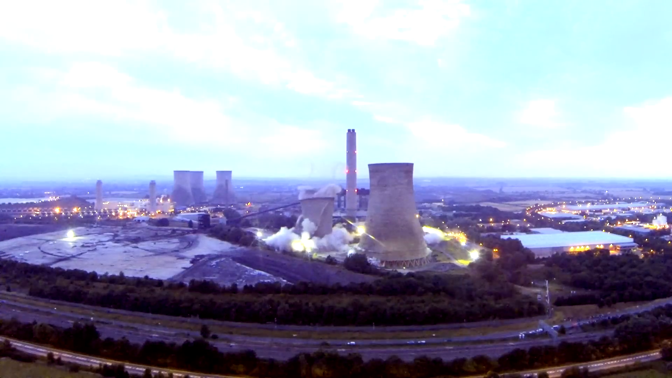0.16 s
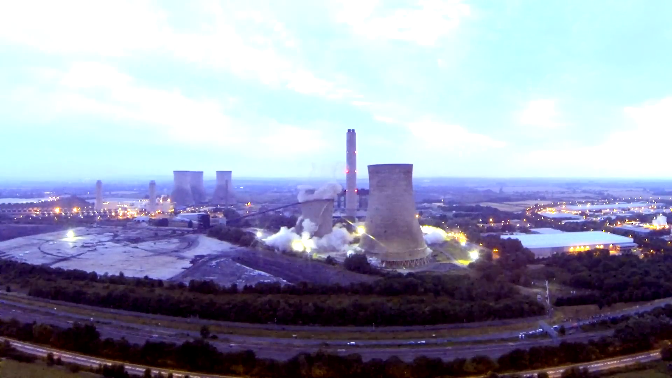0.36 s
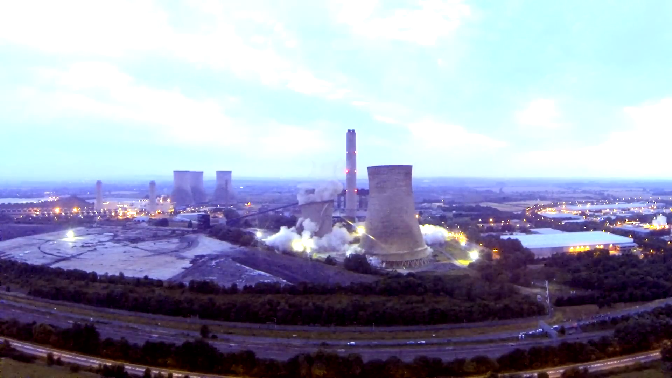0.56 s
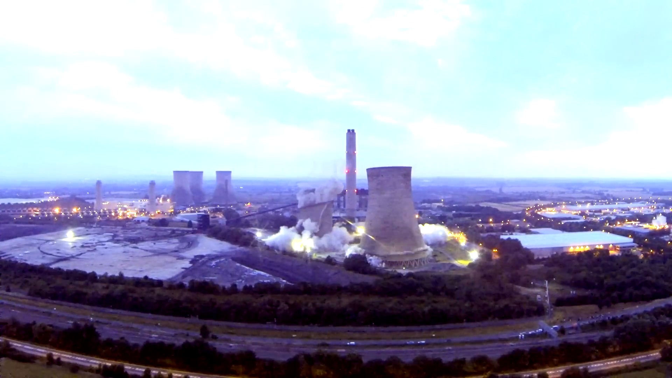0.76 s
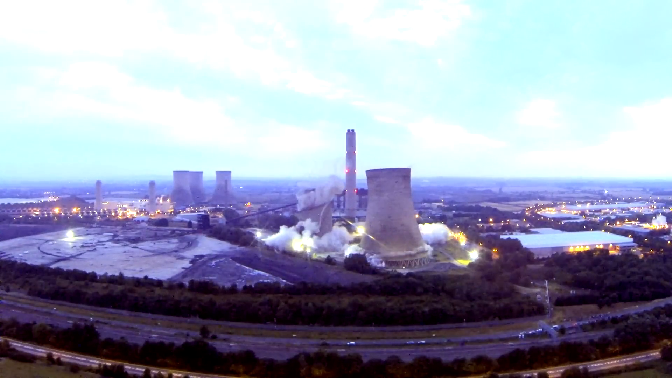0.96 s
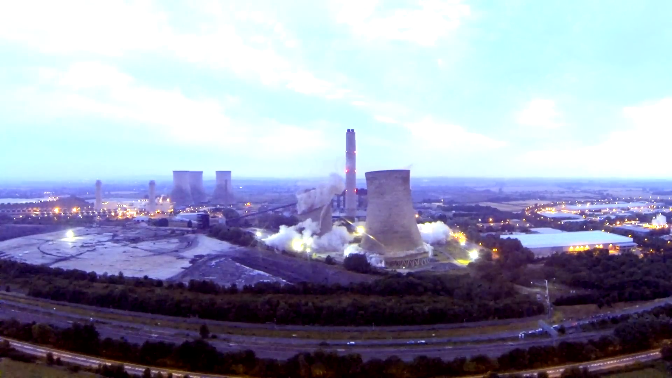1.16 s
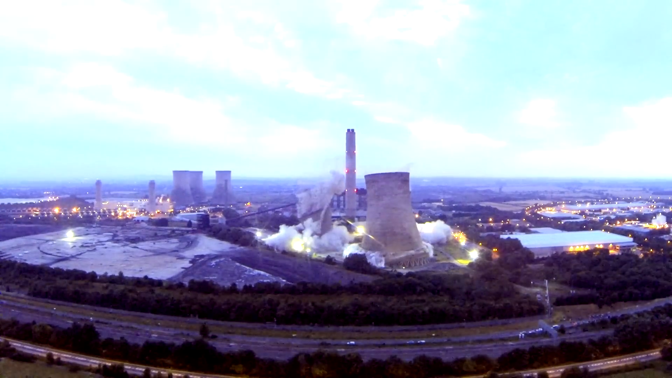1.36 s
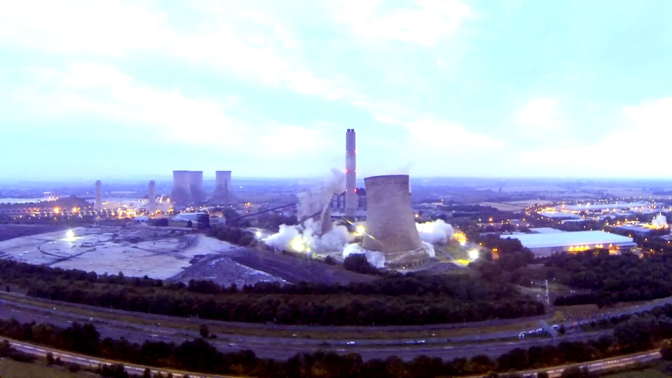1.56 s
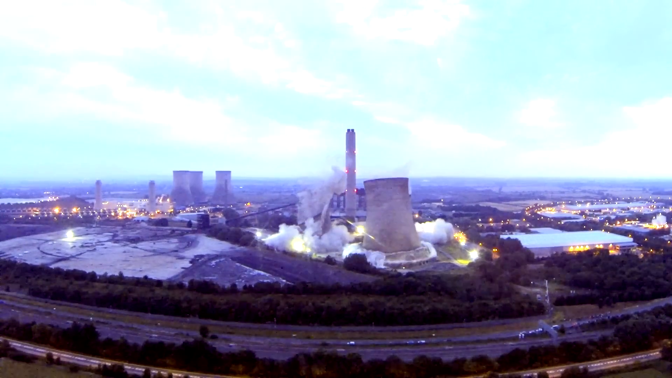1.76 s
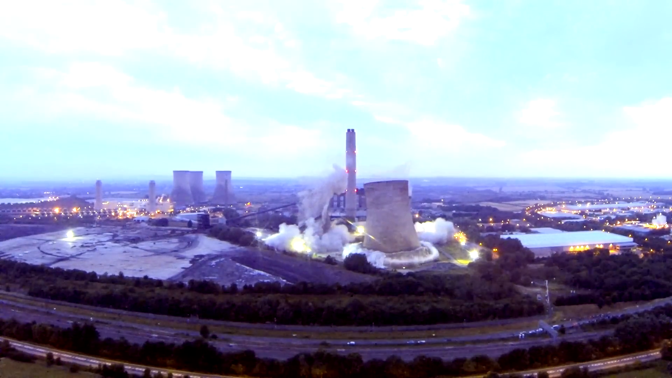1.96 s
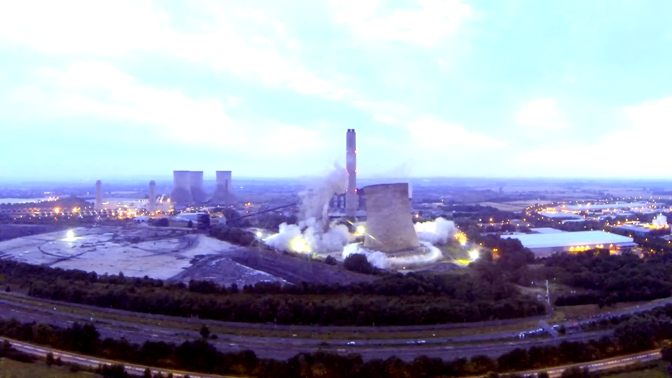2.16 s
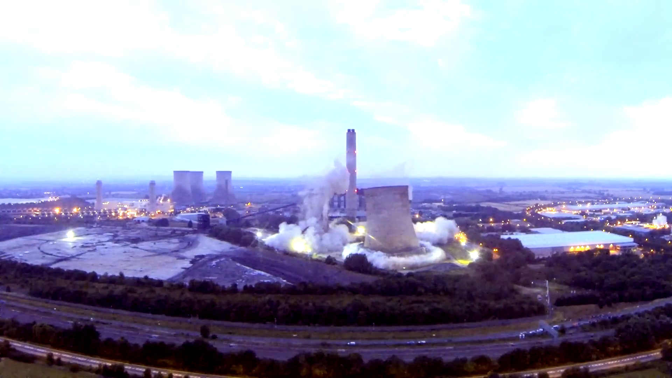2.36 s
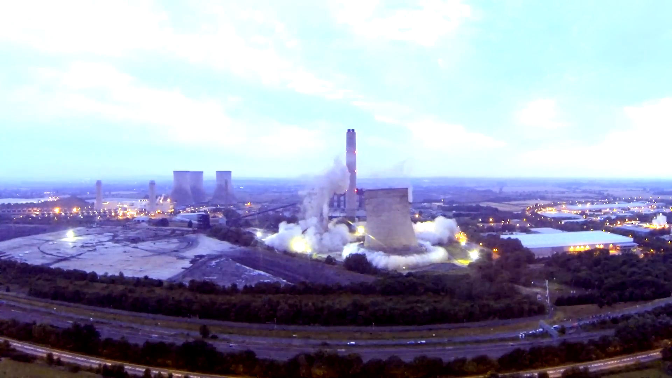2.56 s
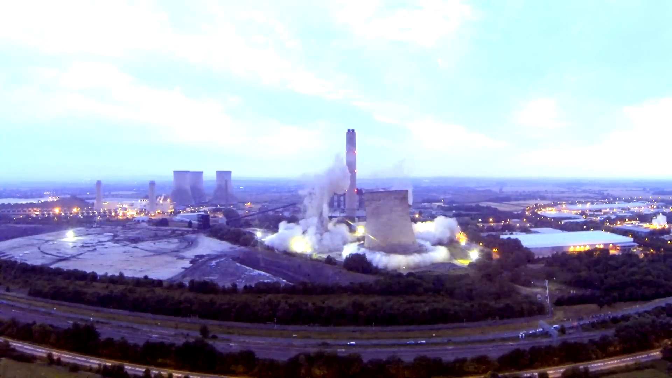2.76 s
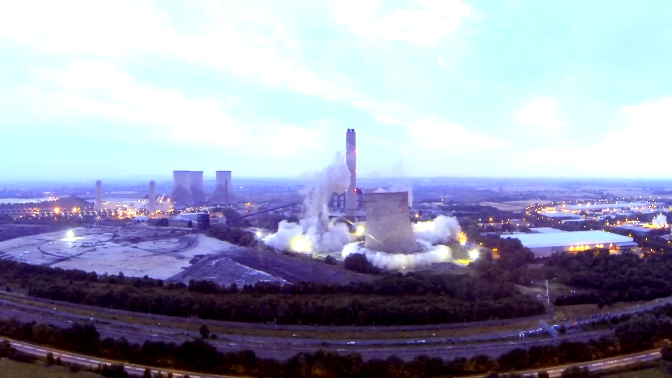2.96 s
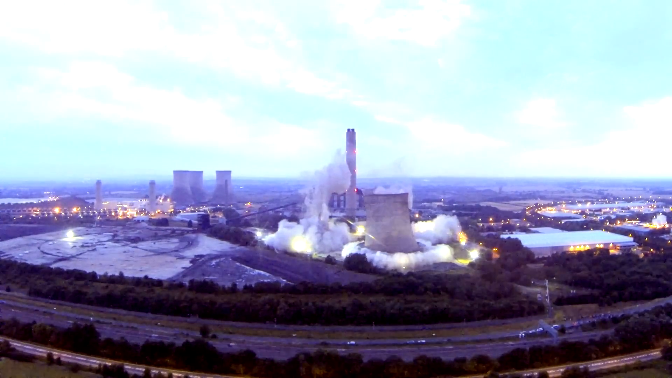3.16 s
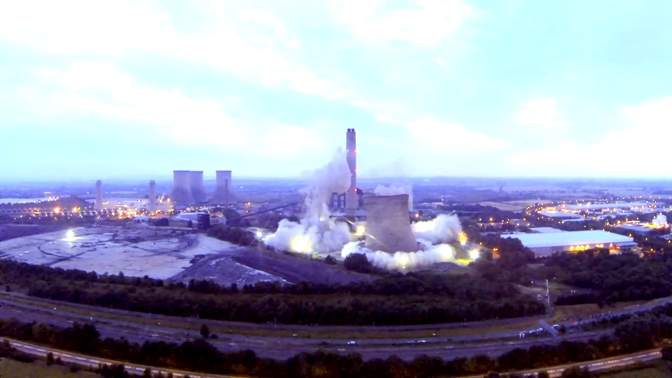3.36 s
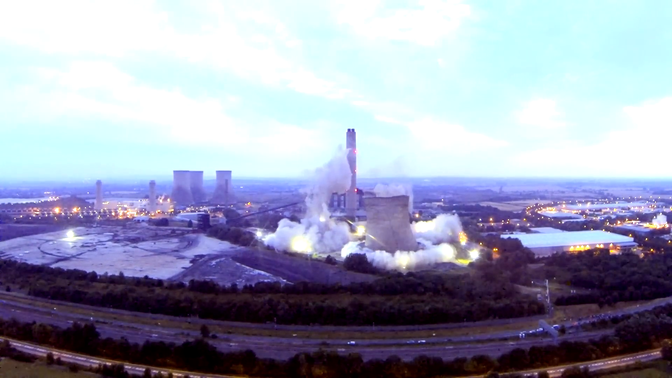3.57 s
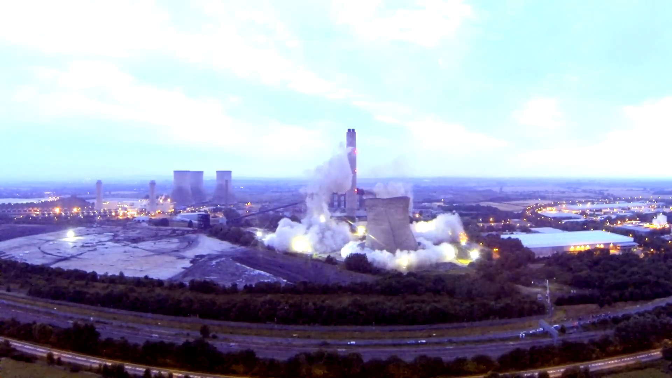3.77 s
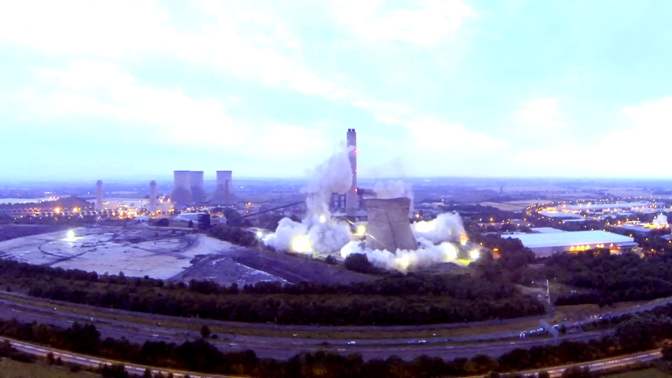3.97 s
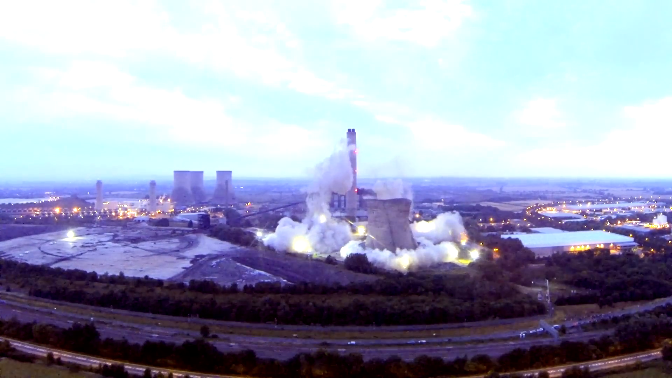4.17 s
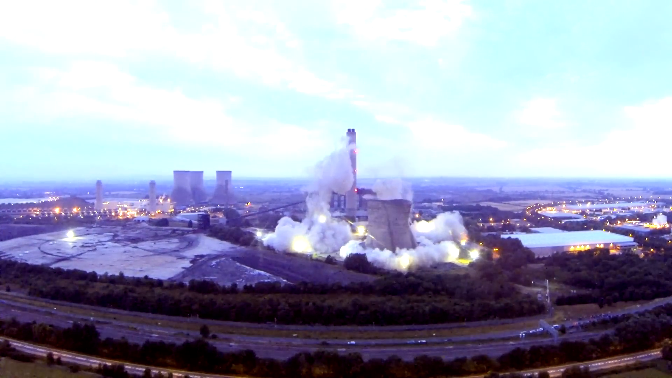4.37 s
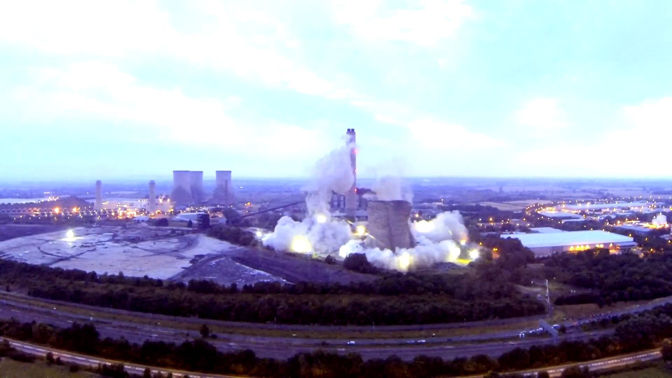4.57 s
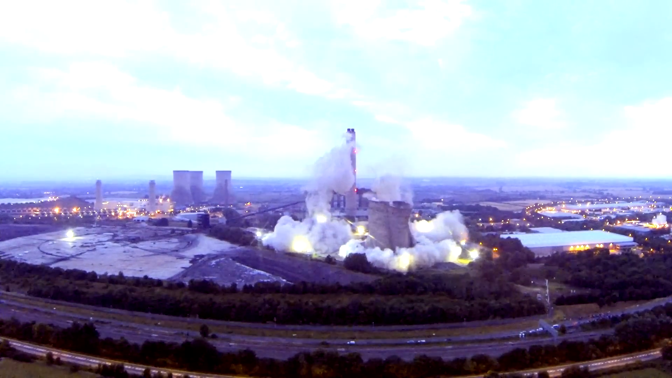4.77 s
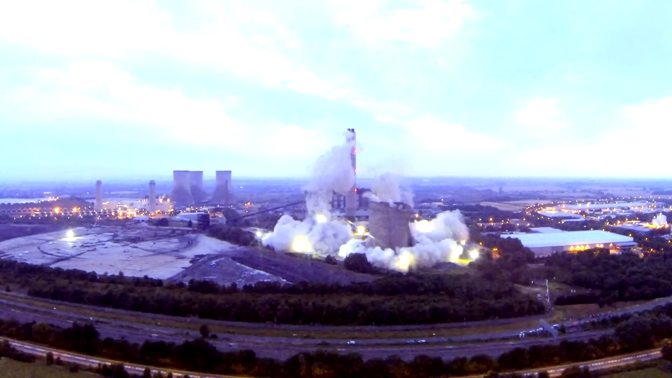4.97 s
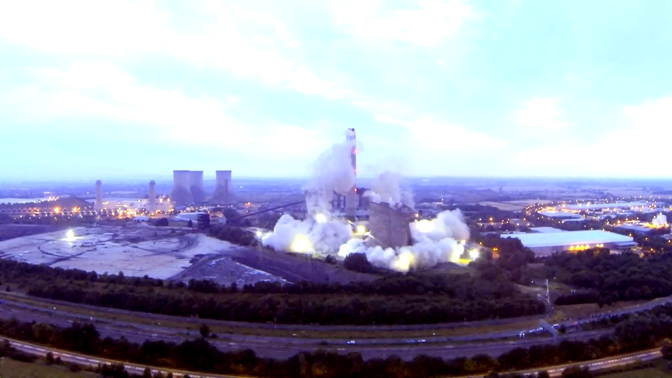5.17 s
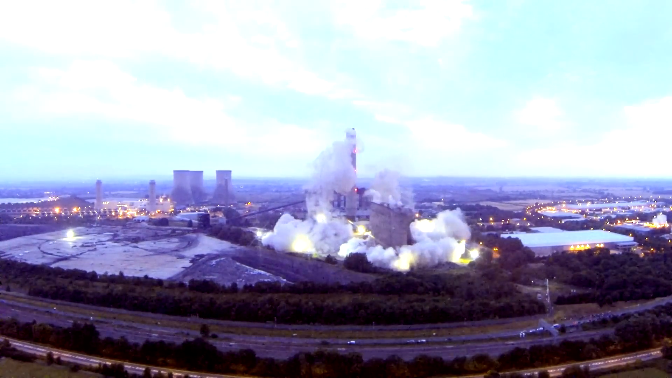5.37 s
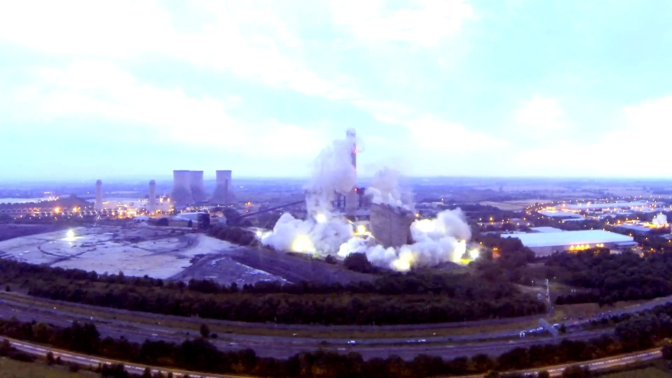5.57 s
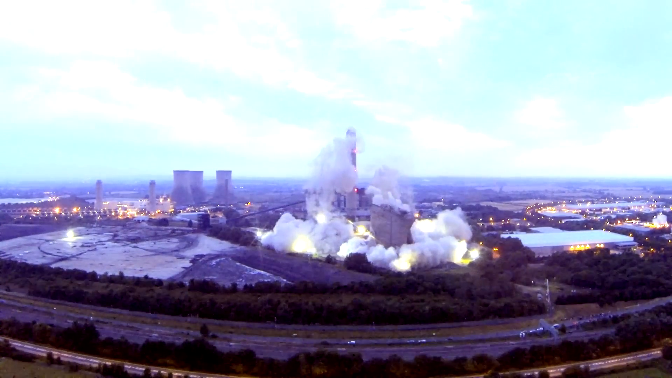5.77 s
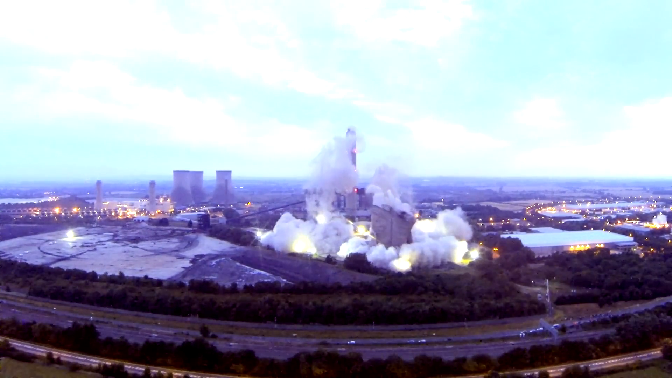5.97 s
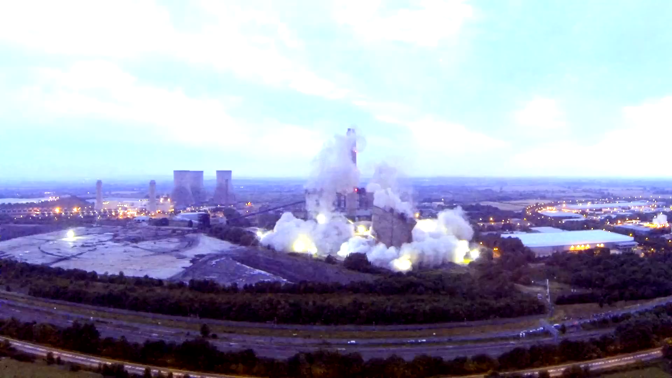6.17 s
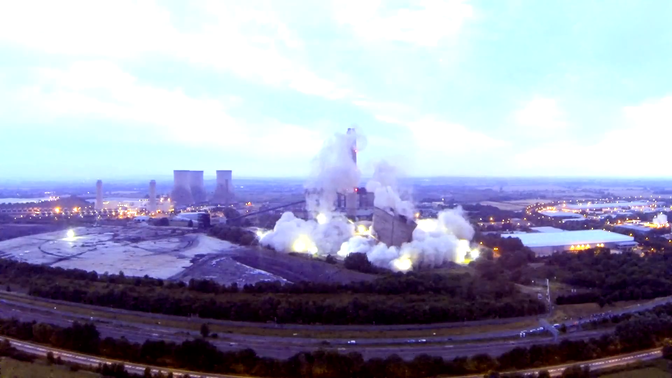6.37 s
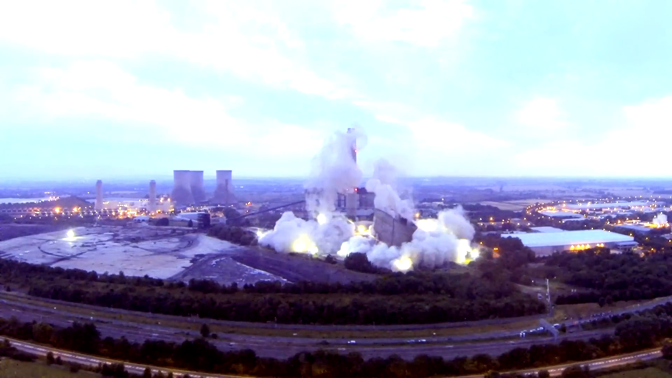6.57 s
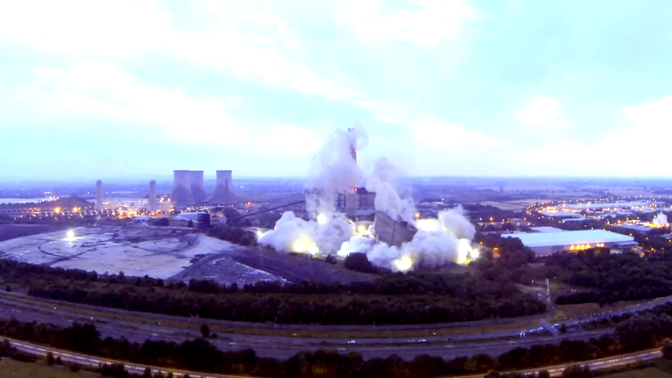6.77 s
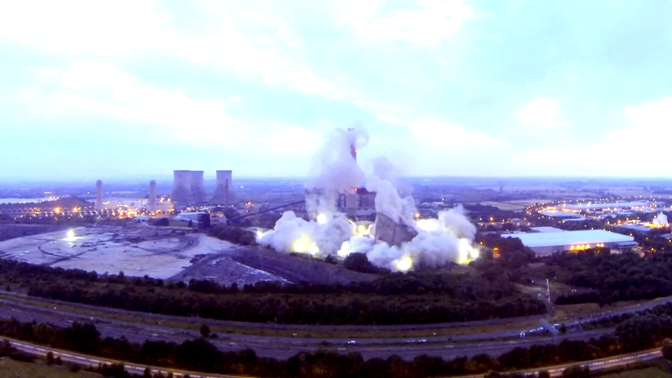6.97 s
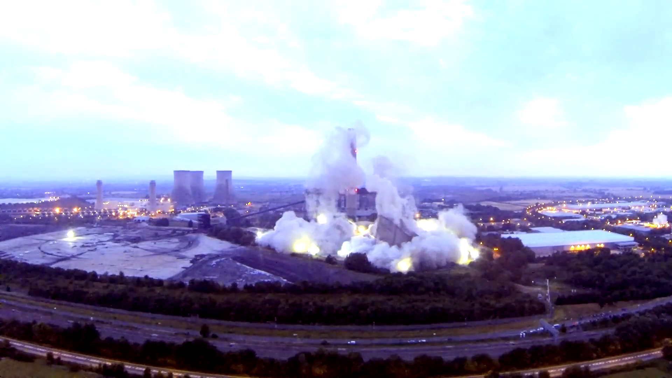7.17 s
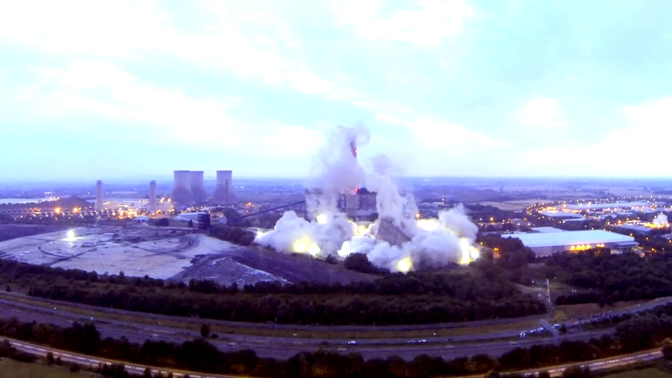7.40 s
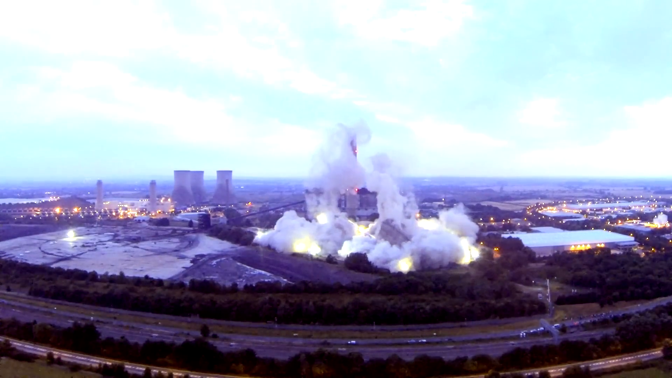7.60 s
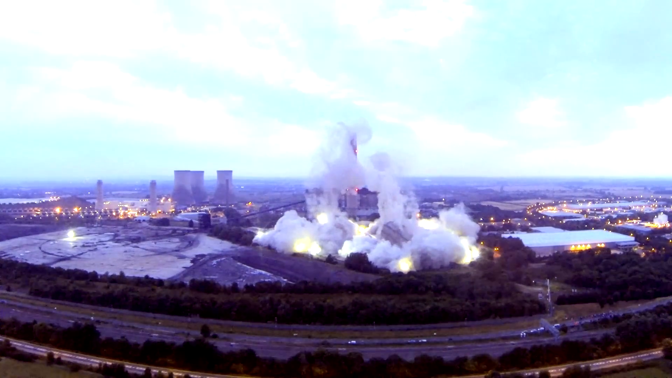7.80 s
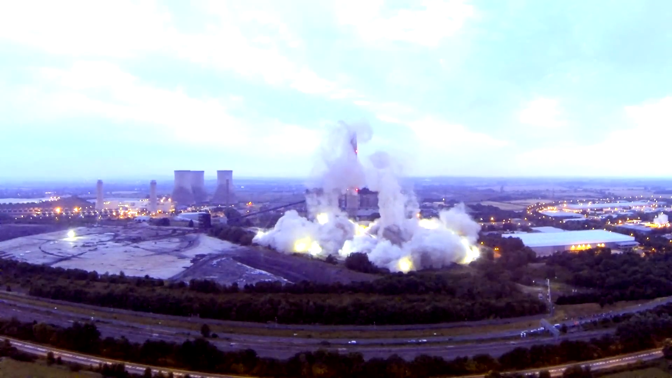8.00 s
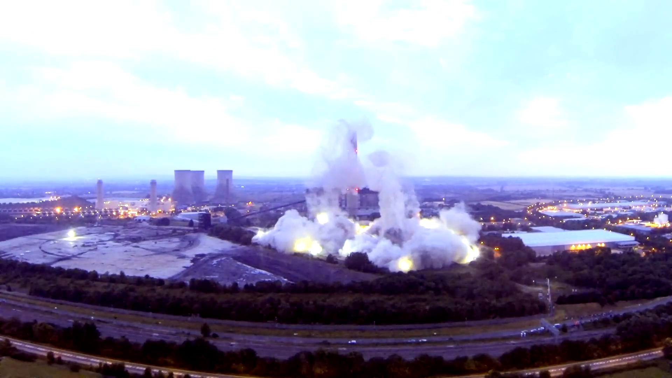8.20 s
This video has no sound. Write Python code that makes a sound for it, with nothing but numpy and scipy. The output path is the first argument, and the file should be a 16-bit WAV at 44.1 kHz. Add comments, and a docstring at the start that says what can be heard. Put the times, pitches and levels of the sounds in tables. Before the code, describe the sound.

Heavy distant demolition blasts hit at once, then cooling towers collapse in a deep roll and hollow concrete roar, sinking over thin hiss and whine.

```python
"""A heavy roar and deep roll begin at once with blast waves, as cooling towers are blown up far away.
Blasts are pressure pulses; the roll, thuds and breaking concrete are random blows through filters.
Hail, fizz and sharp cracks ring a hollow camera housing; the long rumble sinks in surges and echoes.
Hiss, buzz and whine run beneath; ticks are scattered throughout, with a few faint chirps.
Low throbs come late, and a small hard snap near 8 s."""
import sys
import numpy as np
from scipy import signal
from scipy.fft import rfft, irfft
from scipy.io import wavfile
from scipy.ndimage import uniform_filter1d

SR = 44100
rng = np.random.default_rng(int(sys.argv[2]) if len(sys.argv) > 2 else 0)


def pcm_store(signal):
    """Save signal as 16-bit PCM."""
    levels = np.round(np.clip(np.atleast_2d(signal), -1, 1) * 32767)
    wavfile.write(sys.argv[1], SR, levels.astype(np.int16).T)


N = 363384
TIME = np.arange(N) / SR  # s
FREQ = np.fft.rfftfreq(N, 1 / SR)  # Hz


def amp(db):
    """Decibel law: level re full scale to amplitude."""
    return 10 ** (np.asarray(db) / 20)


def unit(x):
    """Power normalisation: scales to rms 1."""
    return x / np.sqrt(np.mean(x ** 2) + 1e-20)


def shape(points):
    """Spectral envelope: levels interpolated over log frequency, as gains."""
    hz, db = np.transpose(points)
    return amp(np.interp(np.log(FREQ + 1), np.log(hz), db))


def modes(rows):
    """Modal superposition: resonance curves added in power, as gains over frequency."""
    power = 0
    for hz, width, db in rows:
        detuning = 2 * (FREQ - hz) / (1.25 * width)
        power = power + (amp(db) / (1 + detuning ** 2)) ** 2
    return np.sqrt(power)


def ring(gain):
    """Minimum phase: the causal response whose gain has this shape, its peak brought to 1."""
    cepstrum = irfft(np.log(np.maximum(gain / gain.max(), 1e-5)), N)
    # folding the cepstrum onto positive time makes the response causal
    cepstrum[1:N // 2] *= 2
    cepstrum[N // 2 + 1:] = 0
    return irfft(np.exp(rfft(cepstrum)), N)[:SR // 8]


def colour(x, gain):
    """Linear filtering: convolution with the causal response."""
    return signal.oaconvolve(x, ring(gain))[:N]


def steady(x, seconds):
    """Short-time power normalisation: keeps the grain, removes slow swells."""
    window = np.hanning(int(seconds * SR) + 3)
    energy = signal.oaconvolve(x ** 2, window, "same")
    weight = signal.oaconvolve(np.ones(N), window, "same")
    return x / np.sqrt(np.abs(energy / weight) + 1e-20)


def add(mix, s, sound):
    """Superposition: mixes a sound in at time s."""
    part = mix[max(round(s * SR), 0):][:len(sound)]
    part += sound[:len(part)]


def impacts(per_s, spread_db):
    """Shot noise: random blows of either sign, many small and a few large."""
    size = amp(spread_db * np.minimum(rng.exponential(1, N), 4))
    sign = rng.choice([-1, 1], N)
    struck = rng.random(N) < per_s / SR
    return unit(size * sign * struck)


def fade(db, db_per_s):
    """Exponential decay: a gain whose level sinks at a constant rate."""
    return amp(db - db_per_s * TIME)


def swell(start, length, attack_s, release_s):
    """Growth and decay: a linear rise, a hold to the end of the length, an exponential release."""
    age = TIME - start
    rise = np.clip(age / attack_s, 0, 1)
    return rise * np.exp(-np.clip(age - length, 0, 20 * release_s) / release_s)


def together(gains):
    """Incoherent addition: unrelated sounds add in power."""
    return np.sqrt(sum(gain ** 2 for gain in gains))


# surges: the opening blow, then sections of shell giving way and sliding; each size adds its share:
# (start [s], length [s], level before the share [dB], brightness [dB per octave])
SURGES = [(-0.03, 0.052, -34, 2.5), (.95, 0.43, -48.5, 0), (1.45, .14, -44, 4.5), (1.62, 0.19, -47, 0),
          (1.947, .11, -42, 4.5), (2.003, 0.13, -42.5, -1.9), (2.158, 0.19, -42.5, 0),
          (2.49, 0.32, -56.5, -3), (3.078, 0.057, -57.5, -3.5), (3.304, 0.74, -56.5, 6.5),
          (3.55, 0.13, -53, 6.5), (4.08, 0.2, -58.5, 1), (4.3, 0.13, -54.5, 1.0), (4.675, 0.51, -64, -3.0),
          (5.364, 0.47, -61.5, 11), (5.925, 0.51, -56.5, 7), (7.203, 0.11, -62.5, 0)]
SURGE_ATTACK_S, SURGE_RELEASE_S = 0.032, 0.14


def debris(volley_db, volley_fade, settling_db, settling_fade, share_db, octaves):
    """Double decay: a fast fade after the volley and a slow settling, with surges on top."""
    levels = [fade(volley_db, volley_fade), fade(settling_db, settling_fade)]
    for s, length, db, bright_db in SURGES:
        peak = amp(db + share_db + bright_db * octaves)
        levels.append(peak * swell(s, length, SURGE_ATTACK_S, SURGE_RELEASE_S))
    return together(levels)


# air modes of the hollow housing, the -6 dB bandwidth being 1.25 times the width:
# (centre [Hz], width [Hz], relative level [dB])
HOUSING_MODES = [(409, 268, -13.5), (623, 22, -13), (955, 135, -8), (1083, 297, -5), (1265, 110, 2.5),
                 (1333, 170, 0.5), (1570, 450, -9), (1888, 268, -10.5), (2460, 200, -19.5),
                 (2644, 112, -19), (3012, 270, -21), (3380, 133, -26.5), (3780, 500, -40.5),
                 (4960, 88, -40.5)]


def housing():
    """Cavity resonance: the gain of the air modes in the housing."""
    return modes(HOUSING_MODES)


# spectra of the roll and of the thuds: (frequency [Hz], relative level per hertz [dB])
ROLL_SPECTRUM = [(6, -46), (13, -8), (20, -2), (29, 1.5), (38, -6.5), (60, -7), (78, -11), (100, -18),
                 (150, -36.5), (400, -83.5)]
THUD_SPECTRUM = [(40, -35.5), (80, 1), (105, 1.5), (145, 0), (185, -2.5), (215, -6), (245, -8.5),
                 (300, -14), (380, -24), (600, -31), (1500, -87)]
# echoes swelling out of the roll: (start [s], length [s], level [dB])
LAND_ECHOES = [(0.349, 0.24, -26), (0.713, .5, -31.5), (1.48, 0.52, -33), (2.57, 0.48, -38.5),
               (3.154, 0.37, -41), (3.62, 0.13, -41), (3.88, .17, -43.5), (4.34, .19, -44),
               (4.747, 0.465, -48), (5.417, 0.13, -56), (6.798, 0.11, -47), (7.875, .36, -57)]
ECHO_ATTACK_S, ECHO_RELEASE_S = 0.06, 0.047
# falling slabs: (volley [dB], its fade [dB/s], settling [dB], its fade [dB/s],
# share in a surge [dB], pitch above the roar [octaves])
SLAB_DEBRIS = (-35.5, 6, -48.5, 1.9, -3.5, -3)
# rms level at the start, its fade, and the level it sinks to
ROLL_DB, ROLL_FADE_DB_PER_S, ROLL_REST_DB = -28, 4.5, -56.5


def rumble():
    """Reverberation: blast echoes merge into a dense deep roll; falling slabs thud above it."""
    levels = [fade(ROLL_DB, ROLL_FADE_DB_PER_S), amp(ROLL_REST_DB)]
    for s, length, db in LAND_ECHOES:
        levels.append(amp(db) * swell(s, length, ECHO_ATTACK_S, ECHO_RELEASE_S))
    roll = colour(impacts(per_s=830, spread_db=1.0), shape(ROLL_SPECTRUM))
    slabs = colour(impacts(per_s=1100, spread_db=1.5), shape(THUD_SPECTRUM))
    return together(levels) * steady(roll, seconds=0.29) + debris(*SLAB_DEBRIS) * steady(slabs, seconds=0.34)


# large, middling and small breaking concrete, each: (volley [dB], its fade [dB/s], settling [dB],
# its fade [dB/s], share in a surge [dB], pitch above the roar [octaves])
CRUNCH_DEBRIS = (-49, 6, -60.5, 1.02, -10, -1)
ROAR_DEBRIS = (-36, 8.5, -47.5, 1.31, -2.5, 0)
GRIT_DEBRIS = (-49.5, 9.5, -59, 0.75, -16, 1.31)


def collapse(box):
    """Forced resonance: a hail of concrete rings the housing; big pieces crunch and roar, grit outlasts them."""
    # power shares of the sizes, crossing near 740 and 2150 Hz
    large = 1 / (1 + (FREQ / 740) ** 14)
    small = 1 / (1 + (2150 / (FREQ + 1)) ** 9)
    middling = (1 - large) * (1 - small)
    sizes = [(large, CRUNCH_DEBRIS), (middling, ROAR_DEBRIS), (small, GRIT_DEBRIS)]
    out = np.zeros(N)
    for share, settings in sizes:
        blows = impacts(per_s=2200, spread_db=0.5) + 0.85 * rng.standard_normal(N)
        out += debris(*settings) * steady(colour(blows, box * np.sqrt(share)), seconds=0.24)
    return out


# sizzle of the opening volley: a brief burst, then a faint fading trail
FIZZ_DB, FIZZ_HOLD_S, FIZZ_RELEASE_S = -67.5, 0.27, 0.037
FIZZ_TRAIL_DB, FIZZ_TRAIL_FADE_DB_PER_S = -72, 6.5


def fizz(box):
    """High-mode excitation: the first charges are sharp enough to sizzle in the housing's treble."""
    low_cut = 1 / (1 + (3800 / (FREQ + 1)) ** 16)
    treble = low_cut / (1 + (FREQ / 5200) ** 4)
    burst = amp(FIZZ_DB) * swell(0, FIZZ_HOLD_S, attack_s=0.002, release_s=FIZZ_RELEASE_S)
    level = together([burst, fade(FIZZ_TRAIL_DB, FIZZ_TRAIL_FADE_DB_PER_S)])
    return level * steady(colour(impacts(per_s=2600, spread_db=4.5), box * treble), seconds=0.099)


# spectrum of the preamplifier hiss: (frequency [Hz], relative level per hertz [dB])
HISS_SPECTRUM = [(100, -3), (3000, 10), (4500, 3.5), (5000, 7), (5500, 2.5), (6600, 0.5), (8500, -3),
                 (9800, -2), (10200, -5), (10800, -1.5), (13400, -4), (14500, -8), (15200, -16)]
# treble resonances rung by the field pulses, the -6 dB bandwidth being 1.25 times the width:
# (centre [Hz], width [Hz], relative level [dB])
BUZZ_MODES = [(7070, 390, -3), (10260, 270, 6.5), (11400, 450, 0.5), (13600, 1200, -13)]
# whine, its sidebands and a separate thin tone at 12076 Hz, all lowered together by 1 dB:
# (frequency [Hz], rms level before that [dB])
THIN_TONES = [(9830, -97), (12076, -94), (13067, -99), (13307, -98), (13486, -99), (13546, -98),
              (13786, -94), (13846, -90), (13906, -82), (13966, -96), (14026, -98)]
FIELD_HZ = 59.94  # pulse rate of the camera's fields


def electronics():
    """Noise and line spectra: preamplifier hiss, a pulse-train buzz at the field rate, thin steady tones."""
    hiss = amp(-69.5) * unit(colour(rng.standard_normal(N), shape(HISS_SPECTRUM)))
    samples_from_pulse = ((TIME * FIELD_HZ) % 1 - 0.5) * SR / FIELD_HZ
    pulses = np.sinc(samples_from_pulse)
    buzz = amp(-87.0) * unit(colour(pulses, modes(BUZZ_MODES)))
    tones = np.zeros(N)
    for hz, db in THIN_TONES:
        tones += amp(db) * np.sqrt(2) * np.sin(2 * np.pi * (hz * TIME + rng.random()))
    return hiss + buzz + amp(-1.0) * tones


# the heaviest pressure waves, the push lasting 1.6 times the time scale:
# (time [s], peak level [dB], time scale [s])
BLAST_WAVES = [(0.03, -14.5, 0.0068), (0.095, -17.5, 0.0043), (0.33, -19.5, 0.011), (0.453, -27.5, 0.015),
               (0.702, -20.5, 0.0091), (1.252, -23.5, 0.012), (1.516, -30, 0.013), (1.694, -24.5, 0.0042),
               (1.778, -24, 0.011), (2.045, -25, 0.0028), (3.981, -34, 0.0079), (4.907, -43, 0.0096),
               (5.066, -38.5, 0.0068)]


def blasts():
    """Blast wave: a push and an opposite rebound, its front rounded by the distance."""
    out, t = np.zeros(N), TIME[:SR // 4]
    for s, db, push in BLAST_WAVES:
        u = t / push
        wave = -u * (1.6 - u) * np.exp(-(u / 2.1) ** 2)
        add(out, s, amp(db) * wave / abs(wave).max())
    return out


# sharp reports of charges and snapping concrete: (time [s], peak level [dB])
SHARP_REPORTS = [(0.031, -20.5), (0.079, -25.5), (.184, -30), (0.2, -22.5), (0.227, -27), (0.285, -26),
                 (0.368, -26), (0.415, -27), (0.722, -29.5), (1.02, -38), (1.493, -31.5), (1.566, -26.5),
                 (1.579, -29.5), (1.844, -35), (2.033, -33), (2.178, -30), (2.237, -30.5), (3.527, -38),
                 (3.856, -47), (4.097, -37), (4.189, -35.5), (4.795, -40), (4.987, -42), (5.121, -39),
                 (5.779, -40), (7.742, -42), (8.219, -46)]


def cracks(box):
    """Impulse response: single shocks, dulled by the air, ring the housing and trail ground scatter."""
    out, t = np.zeros(N), TIME[:SR // 12]
    response = ring(box * modes([(1250, 1150, 0)]))  # favours the band around 1.25 kHz
    for s, db in SHARP_REPORTS:
        shock = 0.044 * rng.standard_normal(len(t)) * np.exp(-t / 0.0024)  # scatter
        shock[0] = 1
        crack = signal.fftconvolve(shock, response)
        add(out, s, amp(db) * crack / abs(crack).max())
    return out


# stray small ticks close to the microphone: (time [s], peak level [dB], centre [Hz])
STRAY_TICKS = [(0.052, -53, 4200), (.227, -56, 3970), (.258, -52, 4400), (.894, -60, 4900),
               (1.589, -56, 4950), (1.794, -59, 5200), (2.001, -61, 5100), (3.601, -58, 4900),
               (4.614, -57, 4850), (4.995, -58, 7000), (6.573, -58, 4900), (6.778, -58, 4900),
               (7.270, -57.5, 4970)]
# a light, even ticking close to the microphone while the shells fall
TICKING_START_S, TICKING_PERIOD_S, TICKING_COUNT = 0.177, 0.3374, 7
TICKING_DB, TICKING_HZ = -60, 7300


def ticks():
    """Damped resonance: brief noise bursts, each through one broad resonance twice."""
    out, t = np.zeros(N), TIME[:SR // 30]
    ticking = [(TICKING_START_S + k * TICKING_PERIOD_S, TICKING_DB, TICKING_HZ) for k in range(TICKING_COUNT)]
    for s, db, hz in [*ticking, *STRAY_TICKS]:
        burst = rng.standard_normal(len(t)) * np.exp(-t / 0.004)
        resonance = signal.iirpeak(hz, 1.7, fs=SR)
        tick = signal.lfilter(*resonance, signal.lfilter(*resonance, burst))
        add(out, s, amp(db) * tick / abs(tick).max())
    return out


# faint calls of a distant bird, before the pitch roughness:
# (time [s], length [s], start pitch [Hz], end pitch [Hz], peak level [dB])
BIRD_CHIRPS = [(0.6, 0.093, 4080, 4060, -66), (0.667, 0.087, 4070, 4300, -68),
               (5.415, .05, 4800, 4520, -69)]


def chirps():
    """Frequency modulation: short gliding tones, roughened by random pitch changes."""
    out = np.zeros(N)
    for s, length, start_hz, end_hz, db in BIRD_CHIRPS:
        count = int(length * SR)
        roughness = 150 * unit(uniform_filter1d(rng.standard_normal(count), size=60))  # 150 Hz rms
        hz = np.linspace(start_hz, end_hz, count) + roughness
        add(out, s, amp(db) * np.hanning(count) * np.sin(2 * np.pi * np.cumsum(hz) / SR))
    return out


# low throbs on two pitches as the rumble dies:
# (start [s], length [s], mean pitch [Hz], rms level [dB])
LOW_THROBS = [(5.4, .17, 76.6, -53.5), (5.516, 0.1, 57.5, -49.5), (5.73, 0.22, 76.6, -55.5),
              (5.975, 0.35, 76.6, -53), (6.083, 0.23, 57.5, -54), (6.46, 0.2, 57.5, -57.5),
              (6.86, .33, 57.5, -48), (7.025, 0.12, 76.6, -47), (7.26, 0.17, 57.5, -45),
              (7.435, 0.17, 76.6, -49.5), (8.01, 0.24, 57.5, -51), (8.083, .16, 76.6, -48)]
THROB_ATTACK_S, THROB_RELEASE_S = 0.07, 0.073


def throb():
    """Beating: two wandering low tones take turns and interfere where they overlap."""
    out = np.zeros(N)
    for s, length, hz, db in LOW_THROBS:
        wander = unit(irfft(rfft(rng.standard_normal(N)) * (FREQ < 14), N))  # slower than 14 Hz
        tone = np.sqrt(2) * np.sin(2 * np.pi * np.cumsum(hz + 3.22 * wander) / SR)
        out += amp(db) * swell(s, length, THROB_ATTACK_S, THROB_RELEASE_S) * tone
    return out


# one snap right at the housing and its rebounds:
# (time [s], peak level [dB], share of bright edge [0-1], decay [s])
SNAP_CONTACTS = [(8.002, -40, 0.16, 0.0069), (8.005, -48, 0.25, 0.0027), (8.015, -53, .7, .0018)]
# what the snap rings, the -6 dB bandwidth being 1.25 times the width:
# (centre [Hz], width [Hz], relative level [dB])
SNAP_BODY_MODES = [(1950, 660, -3), (2410, 340, 2), (3200, 790, -7.5)]
SNAP_EDGE_MODES = [(5500, 1600, 3), (8000, 1600, 0), (10300, 1800, -4), (12500, 1200, -9)]


def snap():
    """Contact excitation: a hard, gritty touch rings a short hollow body and a bright edge."""
    out, t = np.zeros(N), TIME[:SR // 30]
    body = unit(ring(modes(SNAP_BODY_MODES)))
    edge = unit(ring(modes(SNAP_EDGE_MODES)))
    for s, db, bright, decay in SNAP_CONTACTS:
        burst = rng.choice([-1., 1.], len(t)) * np.exp(-(t / decay) ** 1.6)
        click = signal.fftconvolve(burst, (1 - bright) * body + bright * edge)
        add(out, s, amp(db) * click / abs(click).max())
    return out


def scene():
    """Linear superposition: all sources add at the one microphone."""
    box = housing()
    demolition = rumble() + collapse(box) + fizz(box) + blasts() + cracks(box)
    return (demolition + electronics() + ticks() + chirps() + throb() + snap())[None]


def record(dry):
    """Band limiting: a linear-phase low-pass at the recorder's upper edge."""
    low_pass = signal.firwin(511, 15200, window=("kaiser", 9), fs=SR)  # edge in Hz
    return signal.oaconvolve(dry, low_pass[None], "same")


dry = scene()
out = record(dry)
pcm_store(out)
```